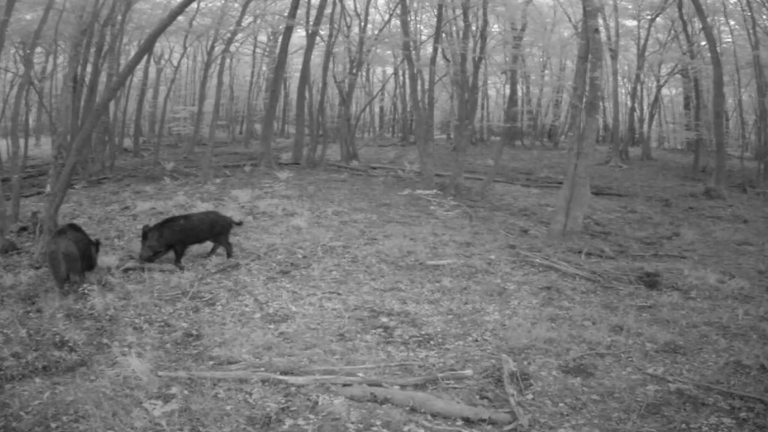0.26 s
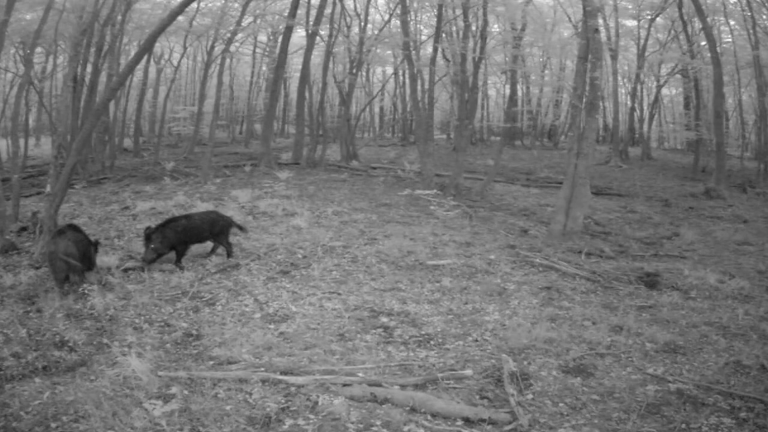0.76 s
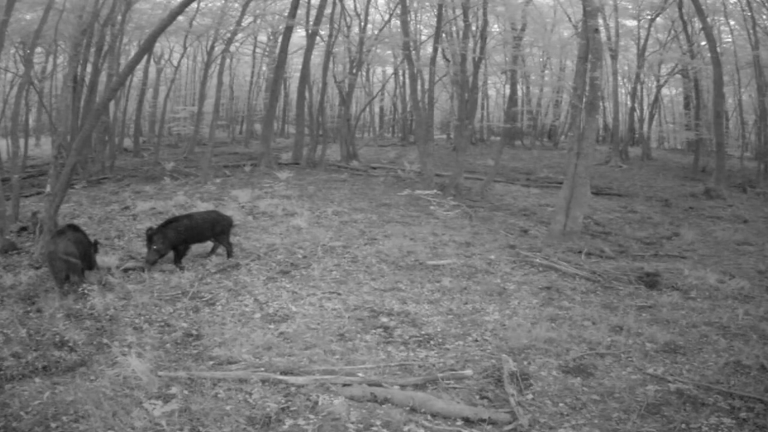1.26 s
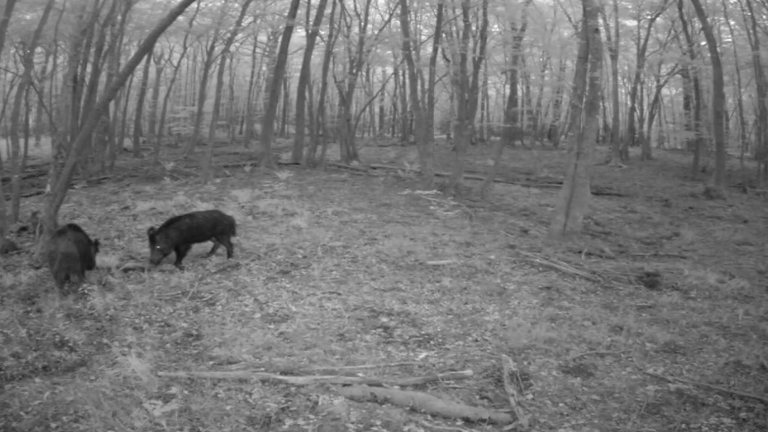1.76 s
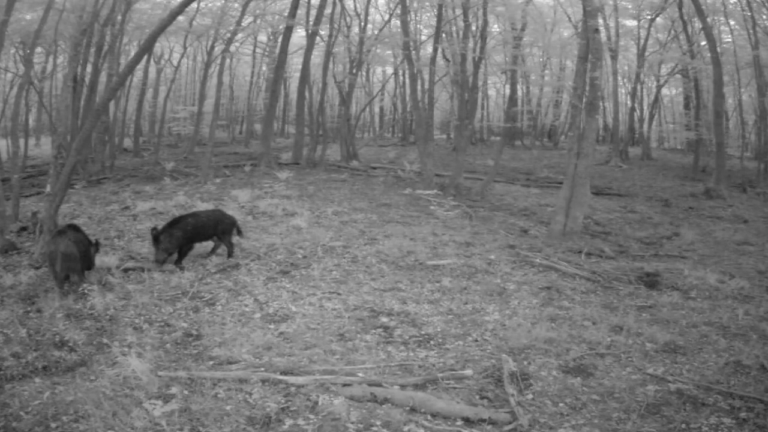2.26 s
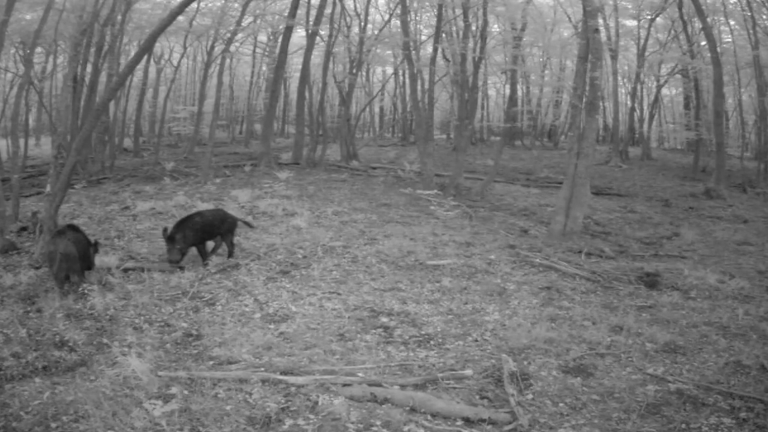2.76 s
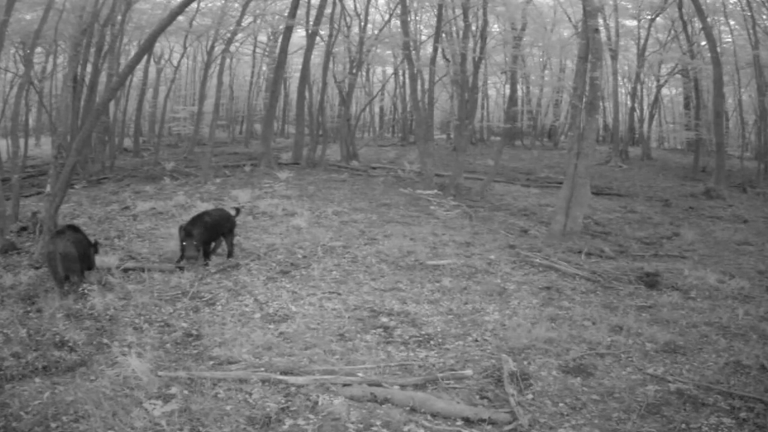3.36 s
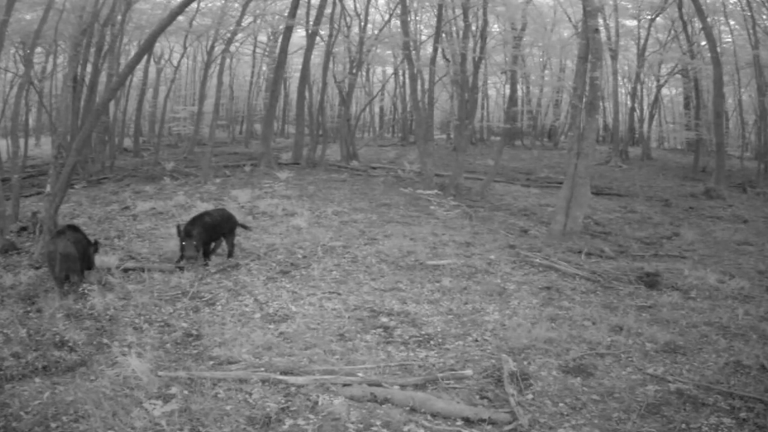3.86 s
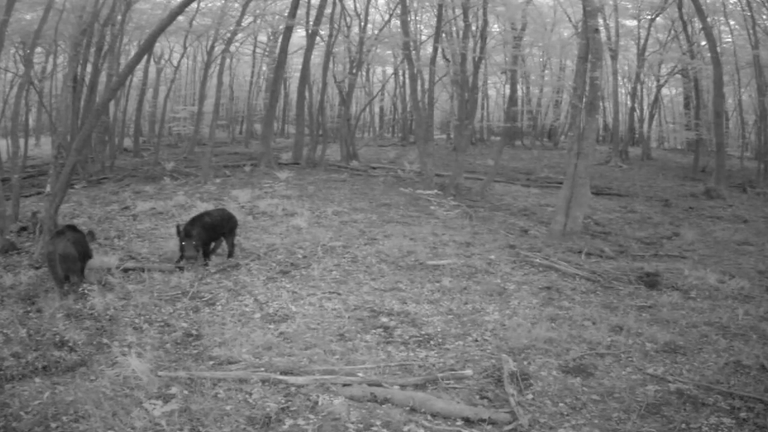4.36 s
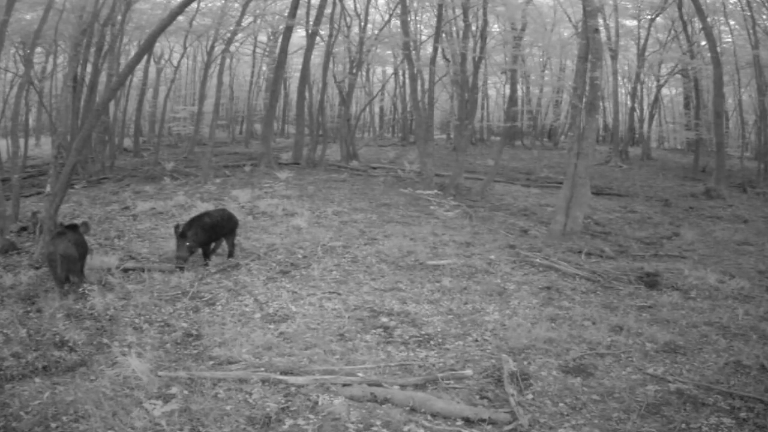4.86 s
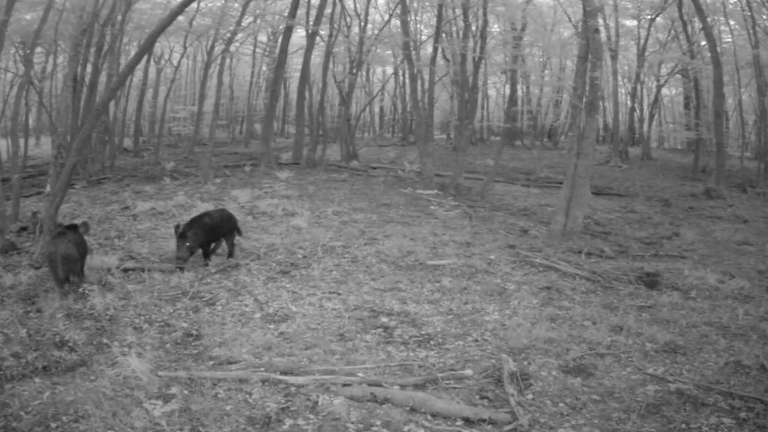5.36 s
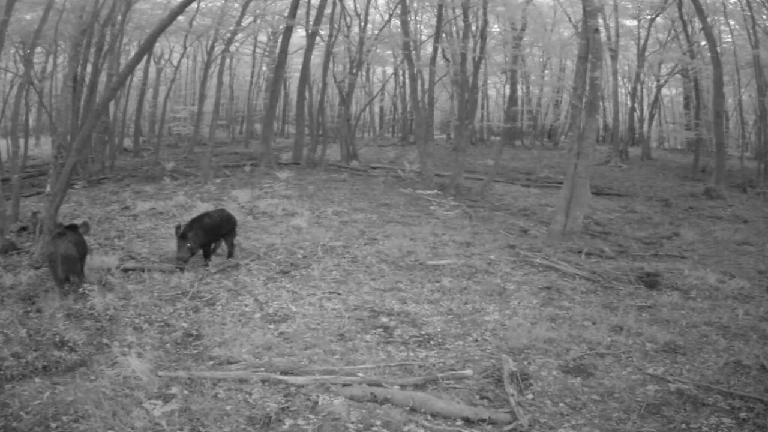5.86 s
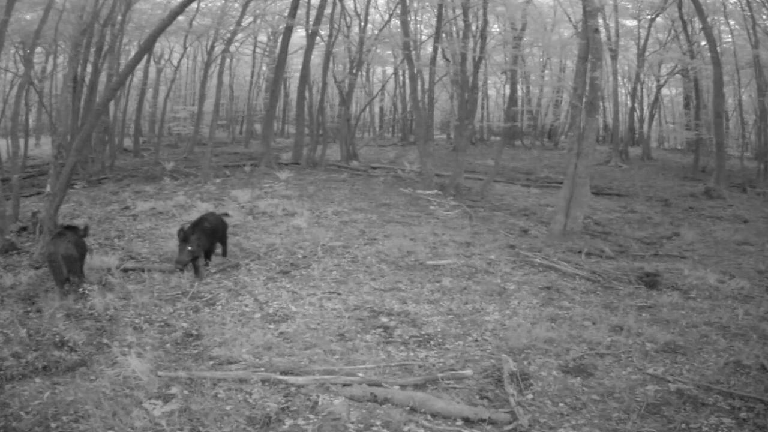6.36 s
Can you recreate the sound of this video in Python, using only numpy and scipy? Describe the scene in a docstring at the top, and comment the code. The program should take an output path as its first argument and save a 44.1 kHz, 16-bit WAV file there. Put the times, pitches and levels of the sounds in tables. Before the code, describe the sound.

Deep, throaty boar grunts at start, middle and end, with leaf rustle, twig snaps and distant echoing birdsong over low air rumble and faint hiss.

```python
"""Low rattling grunts of two wild boars rooting in forest litter: uneven throat flaps ring chest and mouth
resonances. Pushes of air swell the grunts, wet slaps ring with a rising pitch, and gliding sine tones break
through. Noise bursts snuffle and thud like hooves, damped partials smack, short noise bursts snap as twigs, and
sparse grains crackle as leaves. Sliding sine notes of small birds reach the ear mostly as a diffuse echo from
the trunks. Shaped noise gives a low rumble of air and a camera's hiss; a steady sine gives its whine."""
import sys
import numpy as np
from scipy import signal
from scipy.fft import rfft, irfft, next_fast_len
from scipy.io import wavfile
from scipy.ndimage import map_coordinates

SR = 44100
rng = np.random.default_rng(int(sys.argv[2]) if len(sys.argv) > 2 else 0)


def log_audio(samples):
    """Write samples as a 16-bit WAV file to the path given in sys.argv[1]."""
    # one column per channel
    frames = np.atleast_2d(samples).T
    # limit to full scale, then quantise
    limited = np.clip(frames, -1, 1)
    pcm = np.round(limited * 32767).astype(np.int16)
    wavfile.write(sys.argv[1], SR, pcm)


N = 291501  # samples

# Event levels are relative: scene() trims whole layers. Spectrum levels fix only the shape.
# grunts: start_s, length_s, attack_s, nominal flap_rate_hz, flap_jitter_s, rebound_delay_s,
# chest_db, mouth_db, slap_peak_db, slap_ring_hz, slap_t60_s
GRUNTS = [(.005, 0.76, 0.0067, 50, .003, .011, -40, -50, -51, 2730, 0.019),
          (3.031, 0.28, .006, 35, 0.0011, 0.014, -33.5, -52.5, -62, 2520, 0.029),
          (5.9, .77, 0.044, 29, 0.0007786, 0.01496, -35, -55.5, -49, 2960, 0.012)]
# throat and snout resonances, one list per grunt, the first four in the chest: centre_hz, width_hz, level_db
THROATS = [
    [(88, 55, -7), (165.7, 49, 3.5), (215, 41, -3), (294, 32, -12), (605, 18, -12.5), (1051, 18, -18.5),
     (2230, 87, -20.5), (2810, 320, -14.5)],
    [(76, 22, 0.5), (147.4, 29.3, 4), (194, 41, -0.5), (260, 40, -12), (591, 26, -15.5), (970, 70, -25),
     (1674, 37, -21.5), (2360, 48, -21.5), (2730, 18, -17), (3550, 48, -24.5)],
    [(65.2, 8, 3.5), (136.3, 29, 1.5), (195.5, 39.9, 1), (297, 11, -8.5), (596, 19, -15.5), (1102, 40, -21),
     (1640, 200, -23.5), (3170, 520, -19)],
]
# pushes of air within the grunts: crest_s, half_width_s (to 1/e of the lift), chest_lift_db, mouth_lift_db
PUSHES = [(.29, 0.12, 4, 4), (0.594, 0.12, 6.5, -3), (3.062, 0.033, 7, -2), (3.194, 0.049, 7, 13),
          (6.44, 0.11, 3.5, 7)]
# the flaps that slap hardest: start_s, peak_db, ring_hz
HARD_SLAPS = [(.0095, -29, 3310), (0.173, -27, 2690), (0.214, -33, 2650), (0.2323, -30, 2450),
              (0.2473, -24.5, 2860), (0.2641, -27.5, 2570), (0.2919, -29, 2390), (.304, -29, 2830),
              (0.3194, -34, 2680), (0.336, -21.5, 2996), (0.3552, -28, 3000), (0.4113, -31.5, 3020),
              (0.5278, -29, 3060), (0.6395, -35, 2930), (0.6581, -34, 2900), (0.6838, -32, 3100),
              (3.0395, -38, 3370), (3.0682, -18.5, 3100), (3.147, -36, 2420), (3.1734, -26, 2414),
              (3.2, -24, 2480), (3.243, -33, 2480), (3.272, -32.5, 2350), (3.317, -37, 2630),
              (5.9318, -37, 3160), (6.1592, -31, 3100), (6.2583, -34, 3260), (6.2917, -29, 3100),
              (6.3549, -32.5, 3000), (6.3856, -24, 2891), (6.4169, -28, 2780), (6.4451, -16, 2860),
              (6.534, -28, 2770)]
# side resonances of a slap: ratio to the ring, level_db
SLAP_SIDES = [(.36, -17), (0.659, -10.5), (1.45, -13.5), (2.1, -23.5)]
# tones of the throat: start_s, length_s, first_hz, last_hz, level_db
GROANS = [(.225, 0.11, 192.5, 174.4, -37), (.545, .14, 209.4, 155, -33), (3.036, 0.049, 167, 190, -32),
          (3.155, 0.078, 161.4, 132.5, -31.5)]
# spectrum of the low rumble of air: frequency_hz, level_db
AIR = [(25, 1.5), (45, -4), (70, -3), (107, -16), (150, -23.5), (330, -29.5), (800, -44.5)]
# spectrum of the camera's hiss: frequency_hz, level_db
HISS = [(100, 17.5), (300, 8.5), (600, 5), (1500, -2.5), (3000, 0.5), (5000, -2), (8000, -4.5), (12000, -7),
        (15000, -9), (16000, -29)]
# a boar shuffles through the leaves: start_s, length_s, level_db
SHUFFLES = [(0, 1, -62.5), (0.815, 0.16, -59.5), (1.133, 0.12, -59.5), (2.123, 0.051, -58),
            (3.81, 0.49, -66), (4.822, 0.083, -60.5), (4.903, 1, -68.5), (6.077, 0.14, -63),
            (6.337, 0.27, -54)]
# spectrum of the leaf crackle: frequency_hz, level_db
LITTER = [(300, -26), (1000, 1.5), (2500, 1), (6000, 3.5), (9000, 0), (15000, -2.5)]
# single bird whistles: start_s, length_s, pitch_hz, level_db
WHISTLES = [(0.416, .11, 4094, -55.5), (0.869, 0.21, 6550, -56.5), (0.921, 0.052, 4046, -51),
            (1.077, .19, 4294, -53.5), (1.147, 0.05, 7560, -50.5), (1.543, .098, 2350, -59.5),
            (1.546, 0.092, 4290, -55.5), (1.889, 0.061, 7700, -51.5), (1.953, 0.042, 7070, -51),
            (3.875, 0.32, 7440, -58.5), (4.8, 0.18, 3600, -63), (5.336, 0.056, 7150, -56.5),
            (5.912, 0.04, 4216, -59)]
# falling phrases of one bird: start_s, note_spacing_s, level_db
PHRASES = [(1.27, 0.041, -49.5), (2.185, 0.024, -49.5), (4.28, .055, -55.5)]
# notes of the phrase: pitch_hz, level_db
PHRASE_NOTES = [(4320, -5.5), (3780, -2.5), (3260, 0.5), (3030, -4.5)]
# twigs breaking: start_s, peak_db, centre_hz, wood_db (of the lower knock, relative to the crack)
TWIGS = [(0.5625, -22, 5060, -8), (1.407, -23, 4670, -30), (2.1318, -20, 6540, -10.5),
         (3.785, -15, 8700, -6), (4.777, -20.5, 8750, -5), (5.414, -28, 11080, -22),
         (6.315, -12.5, 10160, -15), (6.3816, -15, 7900, -13.5), (6.4706, -18, 7940, -28),
         (6.5103, -16.5, 7800, -31)]
# smacks of jaw and snout: start_s, peak_db, pitch_hz, t60_s, click_db (relative to the knock)
SMACKS = [(.578, -37, 1220, 0.023, -12), (.586, -33.5, 594, .04, -21), (1.04, -40, 367, .2256, -30),
          (2.175, -41, 1220, 0.04, -14), (3.955, -26, 850, 0.012, 7.5), (5.322, -26.5, 1000, 0.043, -1),
          (5.356, -38, 675, 0.16, -21), (6.089, -35, 1260, 0.025, -20), (6.096, -39, 1372, 0.029, -18),
          (6.602, -34.5, 810, 0.041, -19)]
# partials of a smack: ratio to the pitch, level_db
JAW = [(.55, 5.5), (0.996, 13.5), (1.3, 1), (1.55, 0), (3.3, -8)]
# noise bursts, snuffling puffs of air through a snout and soft low thuds of hooves: start_s, length_s, low_db,
# high_db
SNUFFLES_AND_THUDS = [(0.734, 0.032, -40, -52), (2.045, 0.36, -47, -83), (3.234, 0.35, -48.5, -48.5),
                      (3.35, 0.028, -43, -62), (3.455, 0.028, -40, -62), (3.461, 0.44, -47, -60.5),
                      (4.733, 0.26, -51, -50.5), (5.055, 0.078, -51, -45), (5.33, 0.096, -57, -48.5),
                      (5.597, 0.041, -54, -38), (5.634, 0.17, -55, -45), (6.387, 0.11, -46, -45)]
# spectrum of the low part of a puff or thud: frequency_hz, level_db
SNORT = [(40, -9), (100, 6.5), (150, 3.5), (230, 3), (400, -8), (560, -2.5), (900, -35), (1600, -32)]
# spectrum of the high part of a puff: frequency_hz, level_db
SNIFF = [(400, 6), (950, 8), (1300, 4.5), (1780, 4.5), (2870, 4), (7000, -4), (12000, -24)]
# a snout pushes leaves aside: start_s, length_s, level_db
SWEEPS = [(2.154, 0.12, -45)]
# decay of the diffuse answer of the trunks: frequency_hz, t60_s
FOREST = [(100, 0.6), (600, 0.29), (3000, 1), (8000, 0.81), (15000, 0.2)]

RELEASE_S, CHEST_FADE_DB, MOUTH_FADE_DB = 0.12, 40, 3  # at its end a grunt loses more chest than mouth
SLAP_GROWTH = 1.3  # dB of slap per dB of mouth lift
SLAP_SCATTER_DB, SLAP_SCATTER = 0, 0.072  # spread of slap level; relative spread of ring pitch
WHINE_HZ, WHINE_DB, TOP_HZ = 15725, -71, 15850  # the camera's whine and its upper band limit
GUST_DB = 1  # spread of the rumble's slow swell
STIR_DB, STIR_SWING_DB = -66.5, 3  # constant stir of the leaves, relative level and spread
SHUFFLE_SKEW = 0.42  # under 1: a shuffle swells faster than it fades
CHORUS_DB, CHORUS_HZ, CHORUS_SPREAD, CHORUS_NOTE_S = -65, 3650, 0.16, 0.089  # faint random whistles
PHRASE_SLIDE, WHISTLE_SLIDE = 0.083, 0.02  # share by which a note starts above its pitch
SLIDE_SHARE = 0.392  # share of a note in which the slide falls to 1/e
TICK_DB, TICK_SPREAD_DB = -25, 7  # small stalks: loudest relative level, range below it
TICK_HZ, TICK_WOOD_DB = 9100, -17  # their centre and lower knock
CLICK_HZ, CLICK_T60_S = 2145, 0.013  # the sharp edge of a smack


def amp(db):
    """A level in decibels is twenty times the logarithm of the gain."""
    return 10 ** (np.asarray(db) / 20)


def unit(x):
    """Dividing by the root mean square brings a sound to rms 1."""
    return x / np.sqrt(np.mean(x ** 2) + 1e-20)


def along(points, hz):
    """Values at given frequencies are interpolated on a logarithmic axis."""
    f, v = np.transpose(points)
    return np.interp(np.log(hz + 1), np.log(f + 1), v)


def wobble(rate):
    """Spline through random knots, rate a second, gives a smooth fluctuation."""
    knots = rng.standard_normal(int(N * rate / SR) + 4)
    return map_coordinates(knots, [np.arange(N) * rate / SR])


def filtered(x, response):
    """Filtering is multiplication of the spectrum by a response of frequency."""
    m = next_fast_len(len(x) + 4096)
    return irfft(rfft(x, m) * response(np.fft.rfftfreq(m, 1 / SR)), m)[:len(x)]


def coloured(x, spectrum):
    """Spectral shaping at constant power: the result has rms 1."""
    return unit(filtered(x, lambda hz: amp(along(spectrum, hz))))


def noise(spectrum):
    """Shaped white noise is a steady broadband sound of rms 1."""
    return coloured(rng.standard_normal(N), spectrum)


def band(centre_hz, octaves, size):
    """Noise through a bell-shaped band on the octave scale, at rms 1."""
    def bell(hz):
        return np.exp(-.5 * (np.log2((hz + 1) / centre_hz) / octaves) ** 2)
    return unit(filtered(rng.standard_normal(size), bell))


def crackle(spectrum, density, clump_db):
    """Sparse random impulses, density a second, fluctuate into clumps; rms 1."""
    grains = rng.standard_normal(N) * (rng.random(N) < density / SR)
    return coloured(grains * amp(clump_db * wobble(90)), spectrum)


def add(track, s, sound):
    """Superposition: a sound is summed into the track at time s."""
    start = int(np.clip(round(s * SR), 0, N))
    track[start:start + len(sound)] += sound[:N - start]


def effort(s, end):
    """Air pressure lifts chest and mouth, in dB, with each push and falls at the end of a grunt."""
    lift = sum(np.array([chest, mouth]) * np.exp(-((s - crest) / width) ** 2)
               for crest, width, chest, mouth in PUSHES)
    released = max(0, 1 - (end - s) / RELEASE_S)
    return lift - np.array([CHEST_FADE_DB, MOUTH_FADE_DB]) * released


def flap_times(start, end, rate, jitter):
    """Quasi-periodic flapping: uneven steps divide the gaps between hard slaps."""
    marks = [s for s, *_ in HARD_SLAPS if start - .01 < s < end - .01] + [end]
    if marks[0] > start + .02:
        marks = [start] + marks
    runs = []
    for a, b in zip(marks, marks[1:]):
        run = np.linspace(a, b, max(1, round((b - a) * rate)), endpoint=False)
        # the first flap stays exactly on its mark
        runs.append(run + jitter * rng.standard_normal(len(run)) * (run > run[0]))
    return np.concatenate(runs)


def flap(modes, t, scatter, rasp, rise, smear, spread_db):
    """An impulse excites damped resonances, a little differently each time; energy 1."""
    ring = np.zeros(len(t))
    for hz, width, db in modes:
        pitch = hz * np.exp(scatter * rng.standard_normal())
        wave = np.sin(2 * np.pi * (pitch * t + smear * rng.standard_normal()))
        wave = wave + rasp * band(hz, 0.24, size=len(t))
        # a wider resonance dies sooner
        ring += amp(db + rng.normal(0, spread_db)) * width * wave * np.exp(-np.pi * width * t)
    ring *= (1 - np.exp(-t / rise)) ** 2
    return ring / np.linalg.norm(ring)


def slap(hz, t60, bend, rasp, snap):
    """Wet tissue snaps open: a damped ring whose tones rise as the gap widens; peak 1."""
    t = np.arange(SR // 20) / SR
    opening = (1 - np.exp(-t / .0012)) ** 2
    phase = 2 * np.pi * np.cumsum(hz * (1 - bend * np.exp(-t / 0.0019))) / SR
    edge = sum(amp(db) * np.sin(ratio * phase) for ratio, db in SLAP_SIDES)
    edge = edge + rasp * band(hz * 0.972, 0.14, size=len(t))
    # the rough edge has a decay of its own on top of the ring's
    ring = (np.sin(phase) + edge * np.exp(-t / 0.0067)) * amp(-60 * t / t60) * opening
    ring *= 1 + snap * np.exp(-((t - .0016) / 0.00028) ** 2)  # sharp early swing
    return ring / np.abs(ring).max()


def grunts(chest_db, mouth_db, uneven_db, rebound_db):
    """Pulsed excitation: throat flaps thump the chest, rattle the mouth, slap, then fall shut with a thump."""
    rattle, slaps = np.zeros(N), np.zeros(N)
    t = np.arange(SR // 10) / SR
    hard = {s: (db, hz) for s, db, hz in HARD_SLAPS}
    for grunt, throat in zip(GRUNTS, THROATS):
        start, length, attack, rate, jitter, rebound_delay, chest, mouth, slap_db, slap_hz, t60 = grunt
        for s in flap_times(start, start + length, rate, jitter):
            chest_lift, mouth_lift = effort(s, start + length)
            onset = np.clip((s - start + .5 / rate) / attack, 0, 1)
            force = np.sqrt(SR / rate) * amp(rng.normal(0, uneven_db)) * onset
            mouth_ring = flap(throat[4:], t, scatter=0.037, rasp=0.56, rise=0.0011, smear=0.28, spread_db=3.5)
            add(rattle, s, force * amp(mouth + mouth_lift + mouth_db) * mouth_ring)
            for when, db in (s, chest_db), (s + rebound_delay, rebound_db):
                thump = flap(throat[:4], t, scatter=0.035, rasp=0.38, rise=0.0017, smear=0.087, spread_db=3)
                add(rattle, when, force * amp(chest + chest_lift + db) * thump)
            usual_db = slap_db + SLAP_GROWTH * mouth_lift + rng.normal(0, SLAP_SCATTER_DB)
            usual_hz = slap_hz * np.exp(rng.normal(0, SLAP_SCATTER))
            db, hz = hard.get(s, (usual_db, usual_hz))
            add(slaps, s, amp(db) * slap(hz, t60, bend=0.157, rasp=0.67, snap=0.74))
    return rattle, slaps


def background(air_db, hiss_db):
    """Stationary noise: air rumbles with a slight slow swell, under the camera's hiss and sine whine."""
    rumble = amp(air_db + GUST_DB * wobble(2.09)) * noise(AIR)
    hiss = amp(hiss_db) * noise(HISS)
    whine = amp(WHINE_DB) * np.sin(2 * np.pi * WHINE_HZ * np.arange(N) / SR)
    return rumble + hiss + whine


def leaves(level_db):
    """Granular friction: dry leaves crackle softly all the time and swell as a boar shuffles."""
    motion = amp(STIR_DB + STIR_SWING_DB * wobble(4.37))
    for s, length, db in SHUFFLES:
        u = np.linspace(0, 1, int(length * SR))
        add(motion, s, amp(db) * np.sin(np.pi * u ** SHUFFLE_SKEW))
    return amp(level_db) * motion * crackle(LITTER, density=5000, clump_db=3.5)


def groans(waver, shake_db):
    """Voiced oscillation: the throat breaks into a low gliding tone with a shaking level."""
    out = np.zeros(N)
    for s, length, from_hz, to_hz, db in GROANS:
        u = np.linspace(0, 1, int(length * SR))
        pitch = (from_hz + (to_hz - from_hz) * u) * (1 + waver * wobble(50)[:len(u)])
        swell = np.sqrt(np.abs(np.sin(np.pi * u)))
        add(out, s, amp(db) * swell * np.sin(2 * np.pi * np.cumsum(pitch) / SR))
    return out * amp(shake_db * wobble(70))


def note(length, hz, slide, waver):
    """Frequency modulation: a thin sine slides down toward its pitch and wavers."""
    u = np.linspace(0, 1, int(length * SR))
    drift = map_coordinates(rng.standard_normal(80), [u * length * 120])
    pitch = hz * (1 + slide * np.exp(-u / SLIDE_SHARE) + waver * drift)
    return np.sqrt(np.abs(np.sin(np.pi * u))) * np.sin(2 * np.pi * np.cumsum(pitch) / SR)


def birds(level_db, waver, overlap, count):
    """Near-pure tones form falling phrases and single whistles over a faint random chorus."""
    out = np.zeros(N)
    for s, step, db in PHRASES:
        for k, (hz, accent_db) in enumerate(PHRASE_NOTES):
            sung = note(overlap * step, hz, PHRASE_SLIDE, waver)
            add(out, s + k * step, amp(db + accent_db) * sung)
    chorus = []
    for k in range(count):
        s = (k + rng.random()) / count * N / SR
        hz = CHORUS_HZ * np.exp(rng.normal(0, CHORUS_SPREAD))
        chorus.append((s, CHORUS_NOTE_S, hz, CHORUS_DB))
    for s, length, hz, db in WHISTLES + chorus:
        add(out, s, amp(db) * note(length, hz, WHISTLE_SLIDE, waver))
    return amp(level_db) * out


def twigs(level_db, wood_db, cycles, count):
    """Brittle fracture: a noise crack, shorter the higher its centre, with a lower knock; small stalks tick."""
    out, t = np.zeros(N), np.arange(SR // 16) / SR
    ticks = [(rng.random() * N / SR, TICK_DB - TICK_SPREAD_DB * rng.random(), TICK_HZ, TICK_WOOD_DB)
             for _ in range(count)]
    for s, db, hz, knock_db in TWIGS + ticks:
        knock = amp(knock_db + wood_db) * band(2350, 0.9, size=len(t))
        burst = band(hz, 0.46, size=len(t)) + knock
        snap = burst * amp(-60 * t * hz / cycles)  # 60 dB down after so many cycles of the centre
        add(out, s, amp(db + level_db) * snap / np.abs(snap).max())
    return out


def smacks(level_db, rasp):
    """Cavity resonance: parting jaws give a hollow damped knock with a click at its edge."""
    out, t = np.zeros(N), np.arange(SR // 8) / SR
    for s, db, hz, t60, click_db in SMACKS:
        ring = sum(amp(level) * np.sin(2 * np.pi * (hz * ratio * t + rng.random())) for ratio, level in JAW)
        ring = ring + rasp * band(hz * 1.39, 0.24, size=len(t))
        ring = ring * amp(-60 * t / t60) * (1 - np.exp(-t / 0.00036))
        ring += amp(click_db) * band(CLICK_HZ, 0.47, size=len(t)) * amp(-60 * t / CLICK_T60_S)
        add(out, s, amp(db + level_db) * ring / np.abs(ring).max())
    return out


def snuffles_and_thuds(flutter_db):
    """Turbulent flow and soft impacts: noise bursts swell fast and fade, as puffs of air splutter through damp
    soil and hooves thud."""
    low, high = np.zeros(N), np.zeros(N)
    for s, length, low_db, high_db in SNUFFLES_AND_THUDS:
        u = np.linspace(0, 1, int(length * SR))
        swell = np.sin(np.pi * u ** 0.77)
        add(low, s, amp(low_db) * swell)
        add(high, s, amp(high_db) * swell)
    snort = low * noise(SNORT) * unit(amp(flutter_db * wobble(70)))
    return snort + high * crackle(SNIFF, density=1100, clump_db=3)


def sweeps(centre_hz, octaves):
    """Sliding friction: leaves pass over each other with a short bright swish of noise."""
    out = np.zeros(N)
    for s, length, db in SWEEPS:
        u = np.linspace(0, 1, int(length * SR))
        add(out, s, amp(db) * np.sin(np.pi * np.sqrt(u)) * band(centre_hz, octaves, size=len(u)))
    return out


def forest(x, wet_db, build):
    """Multiple scattering: the trunks add a diffuse answer that builds up and dies away."""
    hz, t, z = signal.stft(rng.standard_normal(SR), SR, nperseg=256)
    decay = amp(-60 * t / along(FOREST, hz)[:, None])
    tail = signal.istft(z * decay * (1 - np.exp(-t / build)), SR, nperseg=256)[1]
    return x + amp(wet_db) * signal.fftconvolve(x, tail / np.linalg.norm(tail))[:N]


def scene():
    """Direct-to-diffuse ratio sets distance: the boars are fairly dry, the birds mostly echo."""
    growl, slaps = grunts(chest_db=-2.0, mouth_db=0.5, uneven_db=1.5, rebound_db=-6.5)
    growl = growl + groans(waver=0.014, shake_db=4.0)
    rooting = snuffles_and_thuds(flutter_db=3.0) + smacks(level_db=-0.5, rasp=1.0)
    rooting = rooting + twigs(level_db=-4, wood_db=2.5, cycles=67, count=12)
    rooting = rooting + leaves(level_db=9.5) + sweeps(centre_hz=6540, octaves=0.48)
    song = forest(birds(level_db=-2, waver=0.0172, overlap=1.51, count=32), wet_db=5.5, build=0.0047)
    near = forest(growl, wet_db=-9.0, build=0.0011) + forest(slaps, wet_db=-21.0, build=0.068)
    near = near + forest(rooting, wet_db=-8.5, build=0.018)
    return (near + song + background(air_db=-40.5, hiss_db=-51.0))[None]


def record(dry):
    """Band limitation: the camera keeps nothing from its upper limit on."""
    return filtered(dry[0], lambda hz: hz < TOP_HZ)[None]


dry = scene()
out = record(dry)
log_audio(out)
```